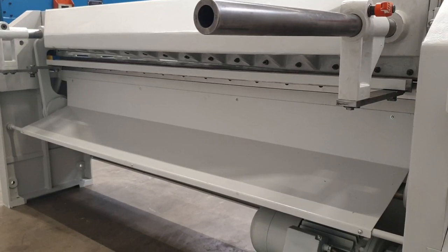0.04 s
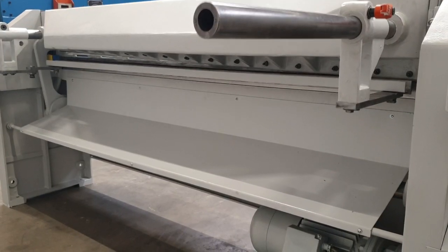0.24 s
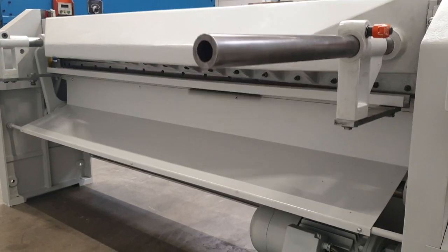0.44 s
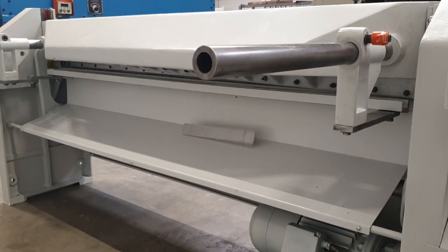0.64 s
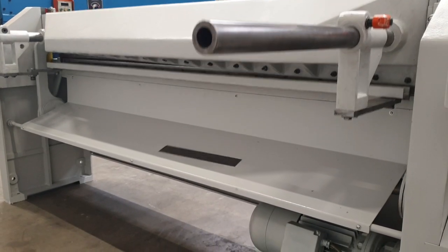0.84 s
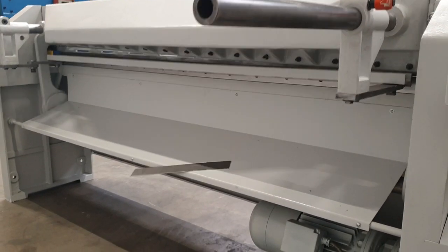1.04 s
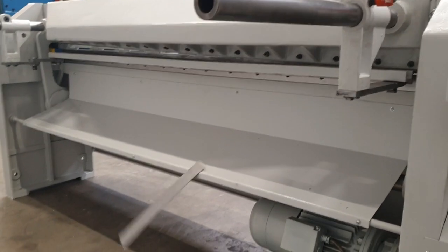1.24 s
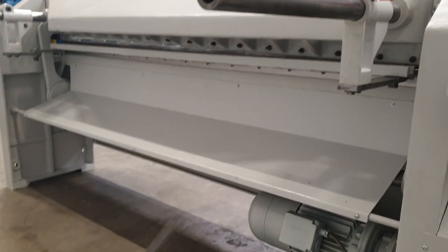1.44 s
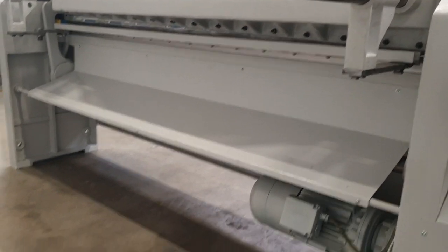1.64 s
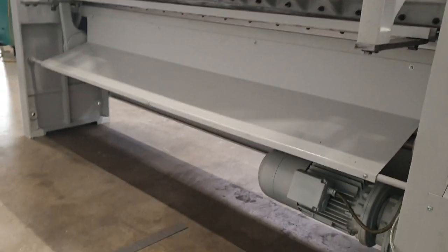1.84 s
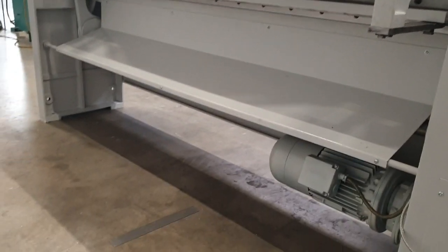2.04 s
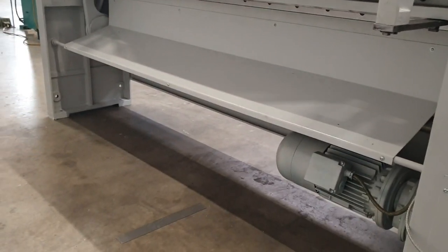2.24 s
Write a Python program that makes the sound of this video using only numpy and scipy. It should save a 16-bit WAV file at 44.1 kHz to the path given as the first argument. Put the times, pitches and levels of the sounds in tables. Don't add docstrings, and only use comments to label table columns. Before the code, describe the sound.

In a hard-walled workshop with low hum, a powered shear clamps, cuts and booms; its blade clanks back, the cut strip slides down sheet metal, then bounces ringing on the concrete floor, picked up fairly close in stereo.

```python
import sys
import numpy as np
from scipy import signal
from scipy.fft import rfft, irfft, next_fast_len
from scipy.io import wavfile

SR = 44100
rng = np.random.default_rng(int(sys.argv[2]) if len(sys.argv) > 2 else 0)


def wrap_up_sound(samples):
    columns = np.atleast_2d(samples).T
    tamed = np.clip(columns, -1, 1)
    steps = np.round(tamed * 32767).astype(np.int16)
    wavfile.write(sys.argv[1], SR, steps)


def natural_amplitude(level_db):
    exponent = np.asarray(level_db, float) / 20
    return 10 ** exponent


N = 101429

# pitch_hz, level_db, t60_s
PANELS = [(1140, 17.5, 0.031), (1410, 9, .033), (1600, -25, .05), (2024, 11, 0.09), (2310, 20.5, 0.022),
          (2700, -7, 0.02), (3370, -7, 0.051), (3855, -6, 0.028), (4580, -11, 0.085), (5100, 1, 0.066),
          (5226, -3, 0.029), (5560, 19, 0.011)]
# frequency_hz, level_db (per Hz)
CLANG_COLOUR = [(290, -4), (500, 1), (798, -4), (872, 2), (1500, -1.5), (8410, -13.5), (10300, -11),
                (15300, -28), (16500, -70)]
GRIPS_S = [1.6, 1.696, 1.757, 1.93, 2.02]
ATTACK_S, RELEASE_S, MUTE_S = 0.0017, 0.011, 0.0045
MOTOR_ON_S = 0.21
RIGHT_LAG_S = 21 / 44100


def at_hz(points, hz):
    points = np.array(points)
    return np.interp(np.log(np.maximum(hz, 1)), np.log(points[:, 0]), points[:, 1])


def near(hz, pitch_hz, octaves):
    return np.exp(-.5 * (np.log2(np.maximum(hz, 1) / pitch_hz) / octaves) ** 2)


def rms_one(x):
    return x / np.sqrt(np.mean(x ** 2) + 1e-20)


def coloured(x, db_at):
    size = next_fast_len(x.shape[-1] + 4096)
    hz = np.arange(size // 2 + 1) * SR / size
    return irfft(rfft(x, size) * natural_amplitude(db_at(hz)), size)[..., :x.shape[-1]]


def high_pass(x, hz, order=2):
    return signal.sosfilt(signal.butter(order, hz, "high", fs=SR, output="sos"), x)


def ring(x, hz, t60):
    radius = natural_amplitude(-60 / (max(t60, .002) * SR))
    angle = 2 * np.pi * hz / SR
    return signal.lfilter([0, np.sin(angle)], [1, -2 * radius * np.cos(angle), radius * radius], x + 1e-18)


def contact(length, rough_db, release):
    t = np.arange(SR // 2) / SR
    shape = np.minimum(t / ATTACK_S, 1) * np.exp(-np.maximum(t - length, 0) / release)
    grit = rng.standard_normal(len(t)) * natural_amplitude(rough_db * rng.standard_normal(len(t)))
    return shape * rms_one(grit), shape


def strength(db, shape):
    return natural_amplitude(db) * np.sqrt(np.mean(shape ** 2))


def add(out, s, x):
    i = int(s * SR)
    out[i:i + len(x)] += x[:len(out) - i]


def choke(t, end):
    return np.exp(-np.maximum(t - end, 0) / MUTE_S)


def struck(hits, modes, colour, ends, modes_db, favour_db, rough_db, scatter_db, release, octaves, peak_db):
    out = np.zeros(N)
    for (s, length, db, tilt, pitch_hz), end in zip(hits, ends):
        burst, shape = contact(length, rough_db, release)

        def slope(hz):
            return tilt * np.log2(np.clip(hz, 300, 16000) / 4000)

        def clatter_db(hz):
            return at_hz(colour, hz) + slope(hz) + peak_db * near(hz, pitch_hz, 0.087)

        clatter = coloured(burst, clatter_db)
        tone = 0
        for hz, mode_db, t60 in modes:
            level_db = mode_db + slope(hz) + favour_db * near(hz, pitch_hz, octaves)
            level_db += scatter_db * rng.standard_normal()
            tone = tone + natural_amplitude(level_db) * rms_one(ring(burst, hz, t60))
        tone = tone * choke(s + np.arange(len(tone)) / SR, end)
        hit = rms_one(rms_one(clatter) + natural_amplitude(modes_db) * rms_one(tone))
        add(out, s, strength(db, shape) * hit)
    return out


def pair(size):
    mid, side = rng.standard_normal((2, size))
    side = high_pass(side, 600)
    return np.array([mid + side, mid - side]) / np.sqrt(2)


def workshop(x, early_db, tail_db, lag=0):
    # frequency_hz, t60_s
    room_t60 = [(50, 1.5), (300, 2.33), (1500, 2.09), (4000, 1.295), (8000, 0.44), (14000, 1.02)]
    t = np.arange(2 * SR) / SR
    noise, tail = pair(2 * SR), 0
    for low in 30 * 2.0 ** np.arange(9.1):
        edges_hz = [low, min(2 * low, .45 * SR)]
        band = signal.sosfilt(signal.butter(2, edges_hz, "band", fs=SR, output="sos"), noise)
        tail = tail + band * natural_amplitude(-60 * t / at_hz(room_t60, 1.313 * low))
    tail = tail * np.minimum(t / 0.023, 1)
    early = pair(2 * SR) * natural_amplitude(-60 * t / 0.12) * (t > .002)
    early = high_pass(early, 300)
    response = natural_amplitude(tail_db) * tail / np.sqrt(np.sum(tail ** 2) / 2)
    response += natural_amplitude(early_db) * early / np.sqrt(np.sum(early ** 2) / 2)
    response[0, 0] += 1
    response[1, int(lag * SR)] += 1
    return signal.fftconvolve(x[None], response, axes=1)[:, :N]


def balance(left_db, right_db):
    return natural_amplitude(np.array([[left_db], [right_db]]))


def shop_hum():
    # frequency_hz, level_db (per Hz)
    hum_colour = [(25, -3), (63, 9), (165, -10), (320, -12), (1000, -20.5), (2300, -34), (3200, -44),
                  (9000, -48)]
    level_db = -42 - 6 * (np.arange(N) > MOTOR_ON_S * SR)
    return natural_amplitude(level_db) * rms_one(coloured(pair(N), lambda hz: at_hz(hum_colour, hz)))


def motor():
    pitch_hz, width_hz = 134.2, 9.8
    hum = rms_one(ring(rng.standard_normal(N), pitch_hz, 2.0 / width_hz))
    return natural_amplitude(-50.5) * hum * (np.arange(N) > MOTOR_ON_S * SR)


def slide():
    # time_s, level_db
    scrape_level = [(.86, -70), (.9, -38), (1.05, -41), (1.2, -41), (1.3, -47.5)]
    # time_s, level_db
    note_level = [(.88, -60), (.95, -33.5), (1.07, -33), (1.1, -59)]
    t = np.arange(N) / SR
    grit = rng.standard_normal(N) * natural_amplitude(1.5 * rng.standard_normal(N))
    tone = sum(natural_amplitude(db) * ring(grit, hz, 0.36 * t60) for hz, db, t60 in PANELS)
    hiss = coloured(grit, lambda hz: at_hz(CLANG_COLOUR, hz))
    scrape = rms_one(rms_one(tone) + natural_amplitude(-0.5) * rms_one(hiss))
    note = rms_one(ring(grit, 447, 0.41))
    scrape_db = np.interp(t, *np.transpose(scrape_level), left=-120, right=-120)
    note_db = np.interp(t, *np.transpose(note_level), left=-120, right=-120)
    return natural_amplitude(scrape_db) * scrape + natural_amplitude(note_db) * note


def clinks():
    # start_s, length_s, level_db, tilt_db_per_octave, pitch_hz
    landings = [(1.445, 0.009, -14.5, 11, 3483), (1.6, 0.012, -23, 5.5, 4675),
                (1.606, 0.0086, -19, 13, 11030), (1.692, 0.0069, -25.5, 5, 5140),
                (1.755, 0.003, -16, 10, 4760), (1.778, 0.011, -20, 3.5, 3980),
                (1.821, 0.0097, -27, 7, 5740), (1.872, 0.017, -30, 4.5, 8400),
                (1.928, 0.0029, -21, 5.5, 5093), (1.936, 0.016, -24, 4, 3483),
                (1.959, 0.011, -27, 2, 11690), (2.015, 0.014, -27, 3, 3680),
                (2.096, 0.0059, -35, -7.5, 1547)]
    # pitch_hz, level_db, t60_s
    strip_partials = [(3440, 4.5, 0.4), (3483, 5, 0.45), (3780, 5, 0.3), (3670, 8, 0.14), (3944, 9.5, 0.28),
                      (4285, 6, .5), (4675, 11.5, 0.3), (5140, -1, 0.35), (5570, 6, 0.34), (6085, 2, 0.23),
                      (6650, -9, 0.14), (7220, 4, 0.3),
                      (7950, -2, .19), (8110, -5, 0.33), (8530, -15, 0.23), (9360, -7, 0.064), (9630, 6.5, 0.11),
             (10055, -7, 0.076), (10780, -10, 0.049), (11100, -22, 0.11), (10900, -6, 0.14),
             (11530, -20, 0.1), (12000, -11, 0.063), (12200, -4, 0.11), (12640, -8, .15), (13820, -7, .1)]
    # frequency_hz, level_db (per Hz)
    clink_colour = [(470, -27), (800, -17), (2730, -4), (3390, -2), (6140, -6), (8640, -8.5), (11100, 0),
                    (15000, -19), (16300, -45)]
    ends = []
    for hit in landings:
        last = max(GRIPS_S[-1], hit[0] + hit[1])
        ends.append(min([s for s in GRIPS_S if s > hit[0] + .025] + [last]))
    return struck(landings, strip_partials, clink_colour, ends, modes_db=-7.0, favour_db=6.5, rough_db=2.5,
                  scatter_db=5.5, release=0.0069, octaves=0.059, peak_db=8.0)


def rings():
    # start_s, peak_db, pitch_hz, t60_s
    partials = [(1.449, -28, 3483, 0.23), (1.448, -43, 4285, 0.38), (1.45, -51, 4675, 0.17),
                (1.602, -29, 4675, 0.22), (1.606, -32.5, 5570, 0.2), (1.697, -22.5, 3807, .12),
                (1.696, -21, 6085, 0.097), (1.71, -31.5, 5140, 0.16), (1.757, -28, 4675, 0.077),
                (1.778, -29.5, 3944, 0.95), (1.818, -32, 4675, 0.47), (1.822, -31, 5130, 0.14),
                (1.817, -46, 5570, 0.26), (1.815, -34, 6650, 0.35), (1.817, -37, 4285, 0.49),
                (1.83, -31, 10055, 0.27), (1.943, -24, 3483, 0.2), (1.94, -29, 3944, 0.41),
                (1.966, -36, 5140, 0.18), (1.817, -33, 6085, 0.27), (1.82, -31, 8530, 0.27),
                (1.449, -37, 5140, 0.27)]
    out, t = np.zeros(N), np.arange(SR // 4) / SR
    for s, db, hz, t60 in partials:
        end = min([g for g in GRIPS_S if g > s + .025] + [N])
        tone = np.minimum(t / ATTACK_S, 1) * ring(signal.unit_impulse(len(t)), hz, t60)
        add(out, s, natural_amplitude(db) * tone * choke(s + t, end))
    return out


def knocks():
    # start_s, peak_db, pitch_hz, t60_s
    edge_hits = [(0.2171, 3, 2910, 0.0033), (.814, -16.5, 2240, 0.05), (1.129, -11, 1323, 0.02),
                 (1.13, -26, 2384, 0.072), (1.1286, -24, 3080, 0.064), (1.233, -25.5, 1310, 0.06),
                 (1.231, -27.5, 2700, 0.024), (1.445, -17, 2300, 0.0062), (1.7569, -12, 2390, 0.0052),
                 (1.7771, -6, 1920, 0.0033), (1.8158, -10, 1924, 0.0071), (1.9288, -21, 1700, .006),
                 (1.941, -19, 1560, .006), (2.0285, -16, 2060, .006), (2.1003, -31, 1413, 0.069)]
    out = np.zeros(N)
    for s, db, hz, t60 in edge_hits:
        add(out, s, natural_amplitude(db) * ring(signal.unit_impulse(SR // 4), hz, t60))
    return high_pass(out, 900)


def squeaks():
    # start_s, length_s, level_db, pitch_hz, width_hz
    rubs = [
        (0.298, 0.012, -22.5, 5140, 900),
        (0.337, 0.0089, -41, 3720, 900),
        (.472, 0.059, -27.5, 5550, 500),
        (0.488, 0.018, -34, 4260, 500),
        (0.775, 0.09, -37, 3880, 400),
    ]
    out = np.zeros(N)
    for s, length, db, hz, width_hz in rubs:
        burst, shape = contact(length, 2.5, RELEASE_S)
        t60 = 2.2 / width_hz
        add(out, s, strength(db, shape) * rms_one(ring(ring(burst, hz, t60), hz, t60)))
    return out


def clangs():
    # start_s, length_s, level_db, tilt_db_per_octave, pitch_hz
    impacts = [(0.203, 0.023, -46, -1.5, 5800), (0.215, 0.01, -17, 1.5, 6500),
               (.265, 0.029, -20.5, -3, 1720), (0.303, 0.063, -27.5, -2, 1930),
               (0.413, 0.084, -25, 1, 1880), (0.469, 0.0072, -13, 6, 5200), (0.489, 0.075, -21.5, 0, 4030),
               (0.606, 0.052, -15.5, 3, 1970), (0.615, 0.029, -16, 4.5, 11400),
               (0.766, 0.015, -25.5, 5, 3970), (0.811, 0.0023, -11, 5.5, 3540),
               (0.843, 0.037, -27.5, 1, 3400), (1.076, 0.045, -30.5, -3, 700),
               (1.128, 0.0032, -22.5, -2, 1315), (1.229, 0.0017, -35, 3, 1326)]
    return [struck(hits, PANELS, CLANG_COLOUR, [N] * len(hits), modes_db=-14.5, favour_db=23, rough_db=2.5,
                   scatter_db=1.0, release=0.015, octaves=0.34, peak_db=4.5)
            for hits in (impacts[::2], impacts[1::2])]


def booms():
    # start_s, peak_db, pitch_hz, rise_s
    members = [(.23, -17, 398.4, 0.017), (0.256, -20.5, 134, .015), (0.296, -13, 54, 0.024),
               (.298, -15.5, 193, 0.012), (0.349, -24, 51, 0.031), (0.418, -36, 73, .018),
               (0.441, -17, 260, 0.036), (0.47, -10, 78, 0.023), (0.469, -4, 165.7, 0.004),
               (0.503, -18, 151, .013), (0.541, -12.5, 141.4, 0.015), (.56, -17, 53, 0.011),
               (0.621, -40, 160, .02)]
    out, t = np.zeros(N), np.arange(SR // 2) / SR
    for s, db, hz, rise in members:
        swell = (t / rise * np.exp(1 - t / rise)) ** 2
        add(out, s, natural_amplitude(db) * swell * np.sin(2 * np.pi * hz * t))
    return out


def frame():
    # start_s, length_s, level_db, contact_cutoff_hz, pitch_hz
    thuds = [(0.233, 0.018, -16, 600, 395), (0.267, 0.0065, -21.5, 910, 585),
             (0.299, 0.028, -12, 250, 94.5), (.417, 0.028, -12, 850, 505), (0.432, 0.0041, -6.5, 296, 92),
             (0.449, 0.027, -8.5, 810, 700), (0.476, 0.045, -8, 250, 100), (0.498, 0.01, -15, 250, 148),
             (0.549, 0.031, -17.5, 250, 160), (.62, 0.064, -27, 600, 160), (0.81, 0.0057, -22.5, 600, 199),
             (1.074, 0.035, -23, 1060, 600)]
    # pitch_hz, level_db, t60_s
    frame_modes = [(52, -26, 0.2), (68, -9, 0.18), (121.4, -6, 0.28), (160, -12.5, 0.53),
                   (205.9, -1.5, 0.36), (250, 1, 0.23), (306.3, -5, 0.11), (395, -27, .15), (483, -15, 1),
                   (505, -34, 0.18), (585, -6.5, 0.39), (710, -15, 0.11)]
    out = np.zeros(N)
    for s, length, db, cut_hz, pitch_hz in thuds:
        burst, shape = contact(length, 4.1, RELEASE_S)
        push = signal.sosfilt(signal.butter(2, cut_hz, fs=SR, output="sos"), burst)
        tone = 0
        for hz, mode_db, t60 in frame_modes:
            level_db = mode_db + 0.73 * rng.standard_normal() + 8.6 * near(hz, pitch_hz, 0.31)
            tone = tone + natural_amplitude(level_db) * np.exp(-hz / cut_hz) * rms_one(ring(push, hz, t60))
        thud = rms_one(rms_one(tone) + natural_amplitude(3.0) * rms_one(push))
        add(out, s, strength(db, shape) * thud)
    return out


def scene():
    floor = workshop(clinks(), early_db=4.0, tail_db=-5) * balance(1.5, -1.5)
    floor = floor + workshop(rings(), early_db=-8, tail_db=-13)
    edges = workshop(knocks(), early_db=-2.5, tail_db=-16.5, lag=RIGHT_LAG_S) * balance(-2.5, 1.5)
    first, second = clangs()
    blade = workshop(first + slide(), early_db=1.0, tail_db=-6.5, lag=RIGHT_LAG_S)
    blade = blade + workshop(second + squeaks(), early_db=0.0, tail_db=-8.0, lag=RIGHT_LAG_S)
    body = workshop(natural_amplitude(-3) * frame() + booms(), early_db=-3.5, tail_db=-7.5)
    return shop_hum() + motor() + floor + edges + (blade + body) * balance(-1.5, -1.4)


def band_limit(x):
    return signal.sosfilt(signal.butter(12, 16620, fs=SR, output="sos"), x)


def record(dry):
    # frequency_hz, left_minus_right_db
    ports = [(100, 4), (300, -3.5), (1400, -3.5), (3100, -9.5), (5500, -7), (8500, 25.5), (11500, 18),
             (15000, 3.5)]
    x = high_pass(dry, 45, order=3)
    left = coloured(x[0], lambda hz: 0.12 * at_hz(ports, hz))
    right = coloured(x[1], lambda hz: -.7 * at_hz(ports, hz))
    rounded = 1.112 * np.tanh(np.array([left, right]) / 1.272)
    top_cut = signal.cheby2(12, 50, 16700, fs=SR, output="sos")
    return band_limit(signal.sosfilt(top_cut, rounded))


dry = scene()
out = record(dry)
wrap_up_sound(out)
```